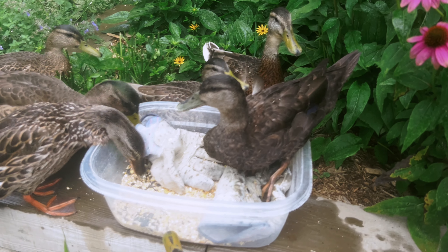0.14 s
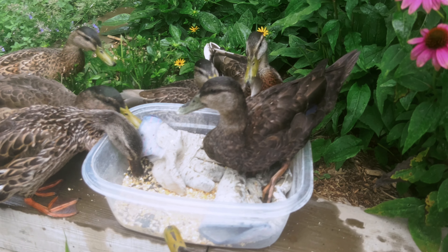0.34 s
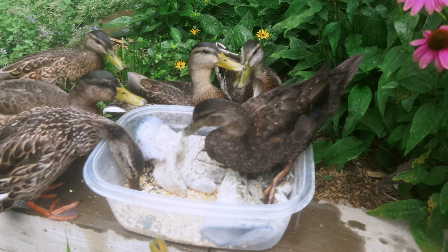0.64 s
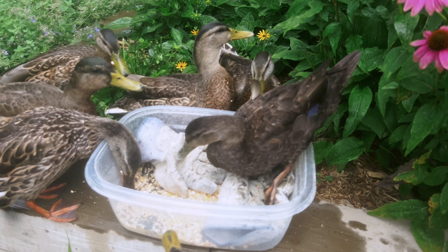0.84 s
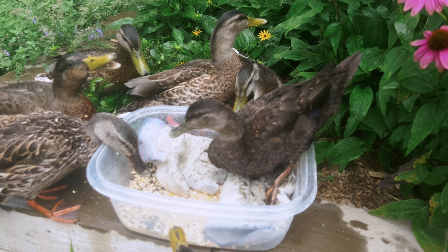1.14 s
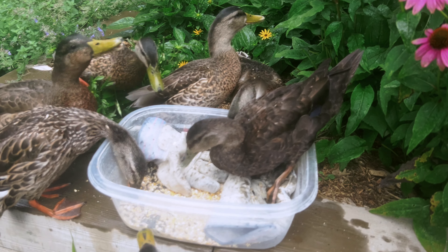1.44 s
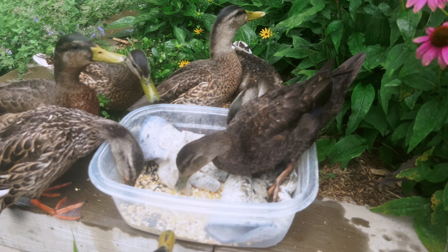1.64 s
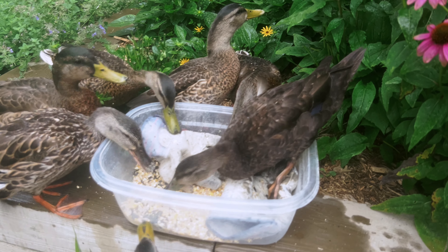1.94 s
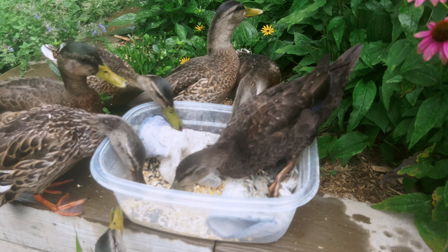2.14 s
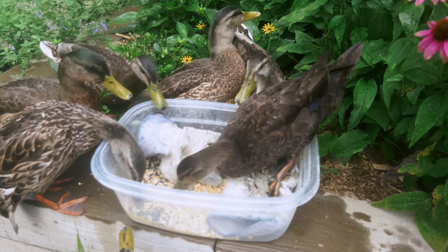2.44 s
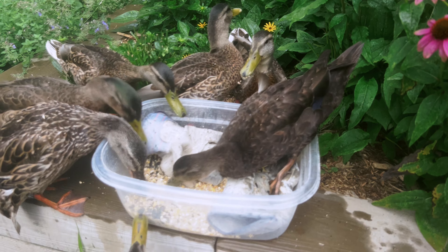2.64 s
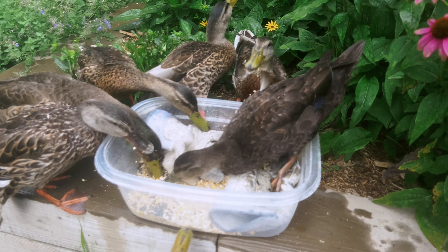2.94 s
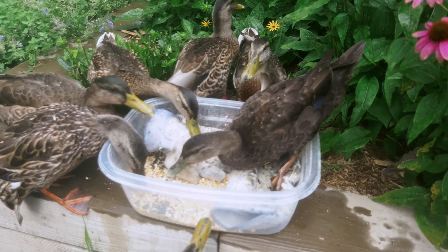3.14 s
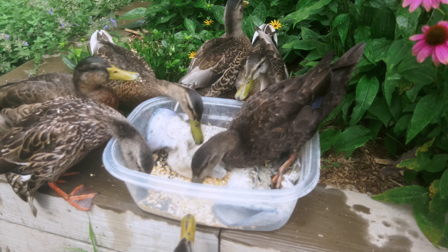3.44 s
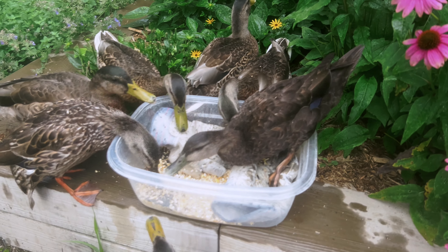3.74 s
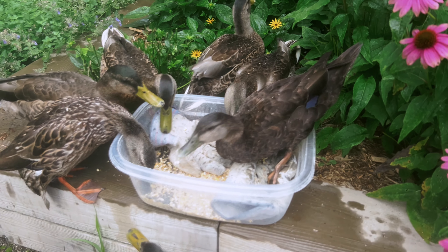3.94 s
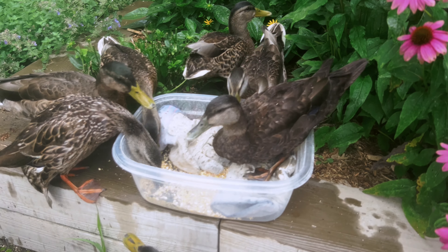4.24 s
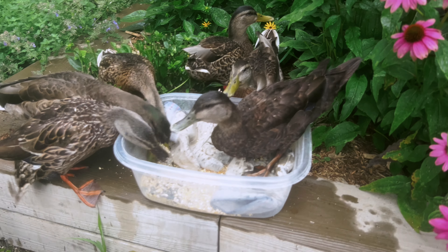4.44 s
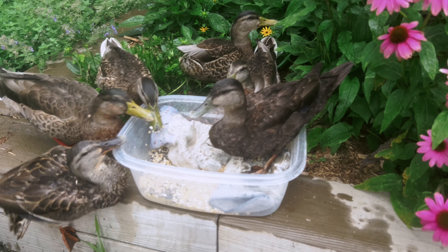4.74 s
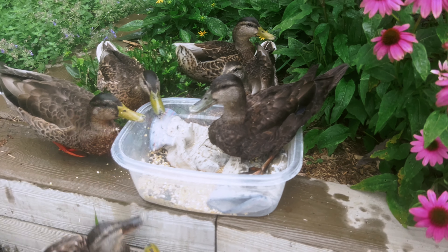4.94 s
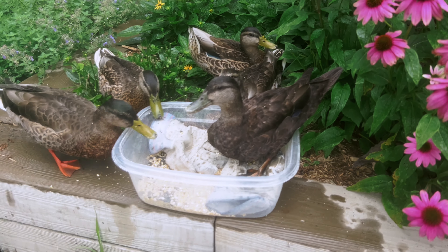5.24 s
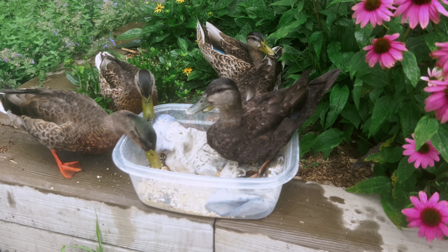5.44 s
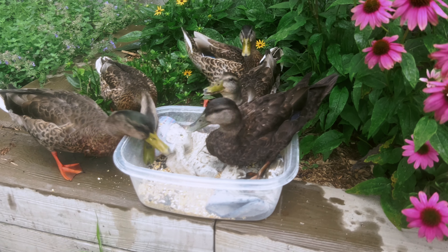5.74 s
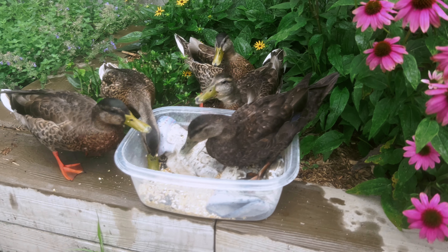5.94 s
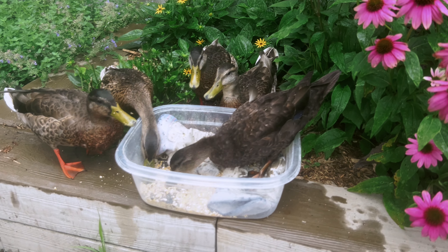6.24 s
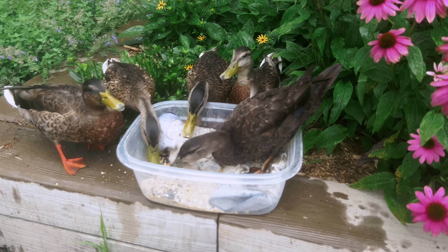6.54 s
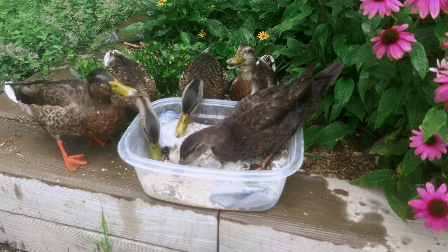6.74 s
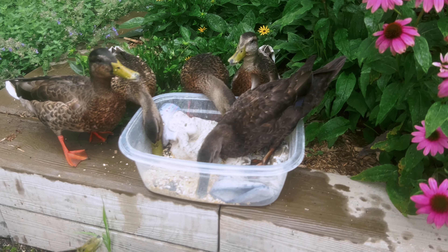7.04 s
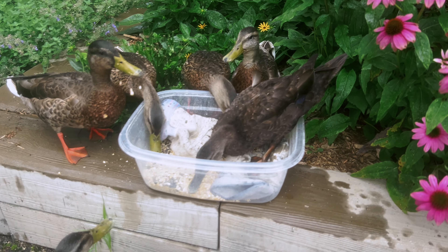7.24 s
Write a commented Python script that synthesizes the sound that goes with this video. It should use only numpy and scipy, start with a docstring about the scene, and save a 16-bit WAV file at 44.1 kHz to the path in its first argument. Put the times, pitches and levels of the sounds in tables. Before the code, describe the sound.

A close outdoor scene of several ducks feeding from a plastic tub of seed, lasting about 7.4 seconds. Soft band-limited hiss runs throughout, with light random tapping and a fine grainy patter. From 0 to 2 seconds quiet, hoarse little quacks mingle with short peeps, hollow tub knocks clustered around 0.9 to 1.6, and dry bill snaps near 1.1 and 1.7. From 2 to 4 it is sparser: muttered quacks, knocks near 3.0 and 3.25, a crisp click at 3.9. From 4.1 the quacks crowd together, louder and raspier, alternating low growls and higher nasal notes, with seed rustling around 4.5. A very sharp snap strikes at 5.3, followed by a flurry of tiny chirps to 5.5. Quacking continues busily through 6.8, strong near 6.5, then thins into a few tub knocks and a final bright snap at 7.35. Bass is thin, treble dulled, reflections short.

```python
"""A garden, with ducks crowding round a plastic tub of seed. Hoarse short quacks are syrinx pulses and
turbulence ringing bill, throat and chest; thin peeps are gliding whistles. Bills snap as ticks with
a spray of noise, sift the seed as dense random grains, and knock the tub wall, ringing its modes.
A soft outdoor hiss lies beneath; near reflections widen the sound."""
import sys
import numpy as np
from scipy import signal
from scipy.fft import rfft, irfft
from scipy.io import wavfile
from scipy.ndimage import uniform_filter1d

SR = 44100
rng = np.random.default_rng(int(sys.argv[2]) if len(sys.argv) > 2 else 0)


def how_loud(loudness_db):
    """Turn decibels into a plain amplitude multiplier (0 dB gives 1, 20 dB gives 10)."""
    steps = np.asarray(loudness_db, float) / 20
    return 10 ** steps


def dump(signal):
    """Clip the signal to [-1, 1] and save it as 16-bit WAV at the path in sys.argv[1]."""
    limited = np.clip(np.atleast_2d(signal).T, -1, 1)
    pcm = np.round(limited * 32767).astype(np.int16)
    wavfile.write(sys.argv[1], SR, pcm)


N = 325012

# Duck calls, which also drive the breath. Each row: start in seconds, nominal length in seconds,
# level in dB, pulse rate in Hz, bill resonance in Hz.
QUACKS = [(0.0, 0.025, -39, 351.5, 2000), (0.386, 0.027, -47, 158.6, 1530), (0.58, 0.055, -38, 151, 1040),
          (0.581, 0.041, -38, 151.7, 1940), (0.931, 0.028, -35.5, 342.3, 1400),
          (0.958, 0.036, -38.5, 307.5, 2380), (1.12, 0.022, -36.5, 326, 1960),
          (1.193, 0.051, -43.5, 294, 1730), (1.374, 0.078, -36, 172.4, 1930),
          (1.452, 0.095, -42.5, 76.8, 1840), (1.752, 0.065, -33, 341, 2340), (1.897, 0.04, -39, 338, 2590),
          (1.997, 0.014, -36, 349, 2130), (2.094, 0.035, -44.5, 346, 2280),
          (2.195, 0.019, -41.5, 267, 1490), (2.25, 0.043, -42, 382, 1590), (2.526, 0.049, -35, 158.7, 1620),
          (2.695, 0.083, -39.5, 170.7, 1880), (2.796, 0.11, -33.5, 318, 1670),
          (2.975, 0.0056, -29.5, 422, 2800), (3.103, 0.046, -32, 338, 1700),
          (3.367, 0.031, -41.5, 156.2, 2000), (3.371, 0.045, -39, 279, 990),
          (3.466, 0.048, -37.5, 142.5, 1600), (3.763, 0.016, -41, 338, 1000),
          (3.786, 0.066, -37.5, 313.4, 1740), (3.905, 0.025, -39.5, 368, 2600),
          (4.062, 0.023, -32.5, 343.4, 1900), (4.065, 0.098, -33.5, 163.2, 1010),
          (4.091, 0.021, -33.5, 319.6, 1830), (4.119, 0.072, -30.5, 157.4, 1600),
          (4.24, 0.036, -25.5, 180.3, 1604), (4.289, 0.061, -31.5, 354, 1850),
          (4.374, 0.036, -27.5, 319.8, 1390), (4.403, 0.059, -40, 193.3, 2000),
          (4.495, 0.05, -28, 303.2, 1600), (4.546, 0.052, -24.5, 345.3, 1860),
          (4.591, 0.053, -31.5, 166.4, 1610), (4.667, 0.048, -47, 151.6, 1710),
          (4.739, 0.038, -32.5, 157.8, 1060), (4.733, 0.046, -31, 163.8, 2140),
          (4.828, 0.062, -25.5, 163.1, 1650), (4.947, 0.039, -28, 297.2, 1485),
          (5.091, 0.029, -32.5, 325, 1390), (5.166, 0.048, -24, 305.2, 1650),
          (5.232, 0.024, -33.5, 287, 1970), (5.55, 0.076, -28, 316.6, 1610),
          (5.65, 0.034, -27.5, 327, 1710), (5.668, 0.021, -18, 265, 2000), (5.78, 0.054, -44.5, 368, 1320),
          (5.831, 0.018, -34.5, 158.5, 2000), (5.905, 0.042, -25.5, 421.3, 1960),
          (5.975, 0.021, -38.5, 181.7, 2050), (6.035, 0.025, -43.5, 120, 1620),
          (6.061, 0.047, -32.5, 149.6, 1720), (6.124, 0.014, -39, 313.7, 1660),
          (6.187, 0.071, -27, 159.1, 1615), (6.252, 0.028, -33.5, 157.8, 2000),
          (6.263, 0.045, -38.5, 166, 1150), (6.341, 0.063, -32.5, 171.7, 1660),
          (6.436, 0.073, -39.5, 111, 1970), (6.507, 0.075, -23.5, 165.1, 1650),
          (6.584, 0.056, -35.5, 165, 1920), (6.67, 0.051, -40, 153, 1740), (6.714, 0.053, -36, 276, 2200),
          (6.833, 0.077, -25, 155.1, 1580), (7.145, 0.035, -49.5, 156.6, 2020),
          (7.313, 0.08, -38.5, 332.3, 1690)]
USUAL_DB = -35.5   # reference quack level


def rms_one(x):
    """Scale to unit rms."""
    return x / np.sqrt(np.mean(x ** 2) + 1e-20)


def colour(x, points):
    """Shape a sound by a (Hz, dB) spectrum, interpolated on log frequency."""
    hz = np.arange(N // 2 + 1) * SR / N + 1
    p = np.array(points)
    gain_db = np.interp(np.log(hz), np.log(p[:, 0]), p[:, 1])
    return irfft(rfft(x) * how_loud(gain_db), N)


def drift(rate_hz):
    """Random wander of unit rms: noise through two equal real poles at rate_hz."""
    r = np.exp(-2 * np.pi * rate_hz / SR)
    settle = 9000   # samples
    noise = rng.standard_normal(N + settle)
    return rms_one(signal.lfilter([1], [1, -2 * r, r * r], noise)[settle:])


def resonance(x, hz, width_hz):
    """Two-pole resonance of unit top gain."""
    r = np.exp(-np.pi * width_hz / SR)
    zeros = [(1 - r * r) / 2, 0, (r * r - 1) / 2]
    poles = [1, -2 * r * np.cos(2 * np.pi * hz / SR), r * r]
    return signal.lfilter(zeros, poles, x)


def evened(x, span_s):
    """Divide out the slow level."""
    power = uniform_filter1d(x ** 2, int(span_s * SR))
    return x / np.sqrt(np.maximum(power, 0) + 1e-12)


def swell(length_s, blunt):
    """Rise and fall over one event; a small blunt makes a flat top."""
    arch = np.sin(np.linspace(0, np.pi, int(length_s * SR)))
    return arch ** 2 ** np.clip(blunt, -3, 2)


def add(out, s, x):
    """Mix a sound in from a given moment."""
    i = max(int(s * SR), 0)
    out[i:i + len(x)] += x[:len(out) - i]


def syrinx(rate_hz, arc, wobble, noise):
    """Pulse trains of one quack: jittered in time and level for the bill, of even level for the chest."""
    jitter, shimmer_db = .03, 1.8
    # Growls alternate strong and weak pulses; the slower rattles do not.
    growl_below_hz, rattle_below_hz, weak_share = 230, 130, .3
    phase = np.cumsum(rate_hz * arc * (1 + jitter * wobble) / SR)   # cycles
    multiple = 2 if rate_hz < growl_below_hz else 1
    steady = np.diff(np.floor(multiple * phase), prepend=0)
    strong = np.diff(np.floor(phase), prepend=0)
    between = np.diff(np.floor(phase + .5), prepend=0)
    weak = weak_share * (rattle_below_hz < rate_hz < growl_below_hz) * between
    pulses = (strong + weak) * how_loud(shimmer_db * noise)
    return pulses, steady, rate_hz * multiple


def bill_and_throat(source, bill_hz, db):
    """Rising bill resonance, a nasal one above it and throat formants, with little below the bill."""
    # Throat formants. Each row: centre in Hz, width in Hz, gain in dB at the usual quack level.
    formants = [(1200, 740, -14), (3016, 400, -18), (4640, 4200, -35), (6200, 540, -28)]
    bill_width_hz, bill_rises, valley_share = 230, .07, .68   # shares of bill resonance
    nasal_ratio, nasal_db = 1.27, -8
    bite_follows = .4   # louder calls are brighter
    opening = np.linspace(0, 1, len(source))
    closed = resonance((1 - opening) * source, (1 - bill_rises) * bill_hz, bill_width_hz)
    opened = resonance(opening * source, (1 + bill_rises) * bill_hz, bill_width_hz)
    nasal_hz = nasal_ratio * bill_hz
    nasal = resonance(resonance(source, nasal_hz, bill_width_hz), nasal_hz, 2000.0)
    voice = resonance(closed + opened, bill_hz, 890.0) - how_loud(nasal_db) * nasal
    for k, (hz, width_hz, throat_db) in enumerate(formants):
        gain = how_loud(throat_db + bite_follows * (db - USUAL_DB))
        voice = voice + (-1) ** k * gain * resonance(source, hz, width_hz)
    valley = signal.butter(5, valley_share * bill_hz, "high", fs=SR, output="sos")
    return signal.sosfilt(valley, voice)


def chest(steady):
    """Low resonances hum on the pulse train, at unit rms."""
    main = resonance(resonance(steady, 370.0, 180.0), 390.0, 300.0)
    return rms_one(main + how_loud(-14.0) * resonance(steady, 603.0, 160.0))


def quacks():
    """Syrinx pulses, each with a puff of turbulence, ring bill and throat; the chest hums below."""
    rasp, puff_decay_s, wander_share = .4, 0.0036, .028
    # The chest hums best when the pulses fall on its resonance.
    chest_hz, chest_top_db, detune_db_per_hz = 324.2, -5, 0.83
    chest_follows = 0.54   # share of the level swing about USUAL_DB
    wander, wobble, flutter = drift(9), drift(76), how_loud(2 * drift(30))
    noise = rng.standard_normal((2, N))
    out, puffs = np.zeros(N), np.zeros(N)
    for s, length_s, db, rate_hz, bill_hz in QUACKS:
        shape = swell(length_s + 0.0055, -0.94)
        n = len(shape)
        i = min(int(s * SR), N - n)
        now = slice(i, i + n)
        arc = 1 + 0.04 * (shape - .8) + wander_share * wander[now]   # pitch follows the effort
        pulses, steady, drive_hz = syrinx(rate_hz, arc, wobble[now], noise[0, now])
        puff = rms_one(signal.lfilter([1], [1, -np.exp(-1 / (puff_decay_s * SR))], pulses))
        source = rms_one(pulses) + rasp * puff * noise[1, now]
        voice = evened(bill_and_throat(source, bill_hz, db), 0.07)
        chest_db = chest_top_db - detune_db_per_hz * abs(drive_hz - chest_hz)
        chest_db += (chest_follows - 1) * (db - USUAL_DB)
        hum = how_loud(chest_db + 3.2 * wobble[now]) * shape * chest(steady)
        add(out, s - .003, how_loud(db) * shape * flutter[now] * (voice + hum))
        add(puffs, s - .003, shape * puff)
    return out, puffs


def peeps():
    """Whistles that rise a little, then fall; low ones show half-pitch lines between their harmonics."""
    # Whistled calls. Each row: start in seconds, nominal length in seconds, level in dB,
    # top pitch in Hz, end pitch in Hz.
    whistles = [(0.033, 0.025, -39.5, 2000, 1960), (0.749, 0.034, -30, 2376, 1953),
                (0.89, 0.052, -43, 2550, 2060), (0.912, 0.025, -26.5, 2900, 1990),
                (1.219, 0.031, -30.5, 2700, 2810), (1.366, 0.039, -37.5, 3260, 1406),
                (3.343, 0.028, -41, 2000, 1530), (4.35, 0.05, -32.5, 1483, 1580),
                (4.898, 0.048, -24.5, 2343, 1940), (5.318, 0.029, -30.5, 2640, 1714),
                (5.336, 0.031, -28, 1820, 956), (5.384, 0.018, -36, 2363, 2230),
                (5.406, 0.014, -25.5, 2160, 1657), (5.43, 0.0081, -26.5, 2133, 1730),
                (5.447, 0.011, -24.5, 2080, 2090), (5.471, 0.024, -35.5, 2103, 972),
                (5.853, 0.024, -30, 2240, 1527), (5.88, 0.039, -38, 1676, 1653),
                (5.952, 0.038, -35.5, 2500, 1214), (6.148, 0.03, -30.5, 2200, 1560),
                (6.17, 0.051, -31, 1590, 1683), (6.308, 0.03, -36.5, 1714, 1486),
                (6.391, 0.12, -40, 3425, 3370), (6.464, 0.027, -34.5, 1950, 1393)]
    # Whistle partials. Each row: multiple of pitch, level in dB before the mouth resonance.
    partials = [(.5, -9), (1, 0), (1.5, 5), (2, -5)]
    rise_s, rise_share = 0.0087, 0.21   # time to the top; rise as share of the fall
    half_lines_below_hz, half_lines_fade_db = 1680, -16   # higher whistles nearly lose the half lines
    mouth_hz, mouth_width_hz, waver = 1830, 680, 0.018
    out, wobble, flutter_db = np.zeros(N), drift(80), 2.2 * drift(110)
    for s, length_s, db, top_hz, end_hz in whistles:
        shape = swell(length_s + 0.0067, -1.5)
        i, n = int(s * SR), len(shape)
        turns = [0, min(rise_s / length_s, .5), 1]
        start_hz = top_hz - rise_share * (top_hz - end_hz)
        hz = np.interp(np.linspace(0, 1, n), turns, [start_hz, top_hz, end_hz])
        sung_hz = uniform_filter1d(hz, n // 6) * (1 + waver * wobble[i:i + n])
        phase = 2 * np.pi * np.cumsum(sung_hz / SR)
        half_db = half_lines_fade_db * (top_hz > half_lines_below_hz)
        tone = np.zeros(n)
        for ratio, partial_db in partials:
            mouth = 1 / np.hypot(1, 2 * (ratio * hz - mouth_hz) / mouth_width_hz)
            tone += how_loud(partial_db + half_db * (ratio % 1 > 0)) * np.sin(ratio * phase) * mouth
        add(out, s - .003, np.sqrt(2) * shape * how_loud(db + flutter_db[i:i + n]) * tone)
    return out


def knocks():
    """Blows ring shifted tub modes; bending waves bring low modes later, sharp blows favour high ones."""
    # Bill on the tub wall. Each row: start in seconds, strength in dB before the common gain,
    # sharpness in dB (extra level of the modes above 750 Hz).
    bill_blows = [(0.125, -29.5, 4), (0.379, -36.5, -12.5), (0.822, -46, -4), (0.857, -28, -5),
                  (0.878, -26, 0.5), (1.081, -29, -9), (1.115, -24, -5), (1.14, -37, 3), (1.261, -27, -15),
                  (1.289, -36, -33), (1.327, -55, 18.5), (1.445, -41, 1.5), (1.515, -39, -10),
                  (1.596, -23, -4), (1.639, -50, -23), (1.707, -37, 4), (1.791, -32.5, 4.5),
                  (1.851, -32.5, -8), (1.925, -29.5, -3.5), (1.964, -34.5, 0), (2.09, -37, 4),
                  (2.642, -34.5, 7.5), (2.705, -46, 8.5), (2.907, -35, -21), (2.986, -33, 6.5),
                  (3.009, -39, -11), (3.25, -30, -6), (3.262, -25.5, -4.5), (3.46, -41.5, 8),
                  (3.56, -51.5, 21.5), (4.475, -30, -2), (4.72, -29.5, -2), (4.81, -37.5, 7),
                  (4.892, -35, 14.5), (5.067, -37.5, 21.5), (5.548, -31, 3.5), (5.598, -28, 6.5),
                  (7.042, -28, 1.5), (7.166, -29.5, -18), (7.248, -30, -2), (7.327, -35.5, 4.5)]
    # Tub wall modes. Each row: centre frequency in Hz, relative level in dB, typical 60 dB decay in seconds.
    modes = [(330.8, 6, 0.032), (394.4, -3.5, 0.06), (520, 7.5, 0.023), (748, -5, 0.038), (1054, 8, 0.013),
             (1518, 0.5, 0.027), (2000, -5.5, 0.015), (2900, -3, 0.02)]
    gain_db, late_s, detune = -5, 0.0029, 0.043
    tap_count, tap_db = 140, -48   # light random taps; top strength before gain_db
    luck = rng.random((tap_count, 3))
    taps = np.c_[luck[:, 0] * (N / SR - .1), tap_db - 10 * luck[:, 1], 16 * luck[:, 2] - 3]
    blows = np.r_[bill_blows, taps]
    hz, db, t60 = np.transpose(modes)[:, :, None]
    out, chance = np.zeros(N), rng.standard_normal((len(blows), 3, len(modes), 1))
    t = np.maximum(np.arange(2400) / SR - late_s * hz[0] / hz, 0)
    for (s, peak_db, sharp_db), (strength, shift, damping) in zip(blows, chance):
        level_db = peak_db + db + gain_db + sharp_db * (hz > 750) + 2.5 * strength
        decay_db = 60 * t / (t60 * how_loud(2 * damping))
        ring = np.sin(2 * np.pi * hz * (1 + detune * shift) * t)
        add(out, s, np.sum(how_loud(level_db - decay_db) * ring, axis=0))
    no_bass = signal.butter(4, 270., "high", fs=SR, output="sos")   # a small tub radiates no bass
    return signal.sosfilt(no_bass, out)


def snaps():
    """A dry tick at its own pitch, then a short spray of noise."""
    # Bill snaps. Each row: start in seconds, tick envelope peak in dB, pitch in Hz.
    bill_snaps = [(0.465, -18.5, 2740), (1.068, -19, 4150), (1.1165, -14.5, 2750), (1.192, -25.5, 2750),
                  (1.6923, -13.5, 3480), (2.644, -14.5, 2900), (2.67, -16, 2900), (2.9769, -16.5, 2860),
                  (3.041, -22.5, 2970), (3.327, -19, 2000), (3.4148, -18.5, 3320), (3.8753, -9.5, 4120),
                  (4.675, -22, 6040), (5.055, -9, 6200), (5.13, -13, 3960), (5.2846, -1, 6480),
                  (5.299, -24, 3500), (5.375, -13.5, 2040), (5.593, -12.5, 2800), (5.99, -17, 2800),
                  (6.04, -30, 3900), (7.022, -23, 2000), (7.3473, -9.5, 5630)]
    ring_s, tail_db, tail_s = 0.00014, -20, 0.0041
    out, t = np.zeros(N), np.arange(1500) / SR
    for s, db, hz in bill_snaps:
        noise = np.diff(rng.standard_normal(len(t) + 1))
        tick = np.cos(2 * np.pi * hz * t) * (t / ring_s) * np.exp(1 - t / ring_s)
        add(out, s, how_loud(db) * (tick + how_loud(tail_db) * noise * np.exp(-t / tail_s)))
    return out


def sifting(puffs):
    """Dense ticks: a patter, bursts of sifted seed, and breath with each quack, throbbing with the syrinx."""
    # Bills sifting seed. Each row: start in seconds, nominal length in seconds,
    # level in dB before the common lift.
    bursts = [(0.475, 0.0037, -39), (0.761, 0.066, -38.5), (0.898, 0.009, -42), (0.987, 0.038, -39),
              (1.535, 0.0079, -39.5), (1.598, 0.011, -35), (1.901, 0.045, -45.5), (2.285, 0.042, -41),
              (2.41, 0.02, -46), (3.411, 0.016, -43), (3.986, 0.032, -42.5), (4.1, 0.016, -32),
              (4.414, 0.014, -37), (4.547, 0.037, -29.5), (4.869, 0.089, -37.5), (5.068, 0.016, -42.5),
              (5.114, 0.045, -44), (5.179, 0.032, -34), (5.41, 0.064, -44.5), (7.057, 0.027, -41),
              (7.144, 0.04, -44.5)]
    # Grain spectrum. Each row: frequency in Hz, relative level in dB per Hz.
    seed_spectrum = [(250, -35.5), (700, -4.5), (1500, 1.5), (2500, 4), (4000, 1), (5200, 0), (6500, 3)]
    per_s, size_db, steady_db, lift_db = 7800.0, 5.5, -52, 12.0
    breath_db, breath_follows = -47, 0.99   # before the lift; share of the quack level swing
    sizes = how_loud(size_db * np.minimum(rng.exponential(1, N), 4)) * rng.choice([-1, 1], N)
    hits = rng.random(N) < per_s * how_loud(2.5 * drift(40)) / SR
    grains = rms_one(colour(sizes * hits, seed_spectrum))
    breaths = [(s, length_s, breath_db + breath_follows * (db - USUAL_DB))
               for s, length_s, db, *_ in QUACKS]
    level = np.full(N, how_loud(steady_db))
    for s, length_s, db in [*bursts, *breaths]:
        add(level, s - .006, how_loud(db + lift_db) * swell(length_s + 0.0024, -1.8))
    return level * grains * evened(1 + 17.0 * puffs, 0.03)


def garden():
    """Outdoor hiss: shaped noise that wavers a little; its low part comes and goes in patches."""
    # Hiss spectrum. Each row: frequency in Hz, relative level in dB per Hz.
    hiss_spectrum = [(35, -37.5), (60, -25.5), (187, -15.5), (346, 2.5), (783, -4.5), (1540, 4.5),
                     (4250, 2), (6090, 1.5), (7000, 3), (9100, -46), (15400, -120)]
    hiss_db = -45
    hiss = rms_one(colour(rng.standard_normal(N), hiss_spectrum))
    low = signal.sosfilt(signal.butter(2, 1100., fs=SR, output="sos"), hiss)
    patches = how_loud(4 * drift(12) - 2)
    return how_loud(hiss_db + 2.74 * drift(10.0)) * (hiss + (patches - 1) * low)


def echoes(x, decay_s):
    """Near reflections from tub, planks and leaves: convolution with decaying noise of unit energy."""
    t = np.arange(int(.08 * SR)) / SR
    spray = rng.standard_normal(len(t)) * np.exp(-t / decay_s)
    return signal.fftconvolve(x, spray / np.linalg.norm(spray))[:N]


def scene():
    """All sources in the middle; reflections widen chiefly the middle band."""
    # Sideways echoes. Each row: frequency in Hz, level in dB.
    side_spectrum = [(200, -21), (700, -13.5), (1200, -5), (2500, -16), (4000, -37.5), (7000, -47)]
    calls, puffs = quacks()
    near = calls + peeps() + knocks() + snaps() + sifting(puffs)
    mid = near + how_loud(-10.0) * echoes(near, 0.02) + garden()
    side = colour(echoes(mid, .02), side_spectrum)
    return np.array([mid + side, mid - side])


def top_cut(x):
    """Nothing passes above the cut-off."""
    return signal.sosfilt(signal.butter(12, 8120, fs=SR, output="sos"), x)


def record(dry):
    """Two close ports differ in phase; bass and everything above the voice band are cut."""
    # Phase between ports. Each row: frequency in Hz, left lead in radians.
    port_lead = np.array([(0, -0.34), (600, 0.21), (1210, 0.63), (1640, -0.8), (3190, 0.85), (5680, 0.041),
                          (7670, 0.17)])
    lead = np.interp(np.arange(N // 2 + 1) * SR / N, port_lead[:, 0], port_lead[:, 1])
    half_turns = np.exp(.5j * lead * np.array([[1], [-1]]))   # half the lead to each side
    ports = irfft(rfft(dry) * half_turns, N)
    ports = signal.sosfilt(signal.butter(2, 190., "high", fs=SR, output="sos"), ports)
    stop_hz = 7220   # 55 dB down from here up
    ports = signal.sosfilt(signal.cheby2(16, 55, stop_hz, fs=SR, output="sos"), ports)
    return top_cut(ports)


dry = scene()
out = record(dry)
dump(out)
```